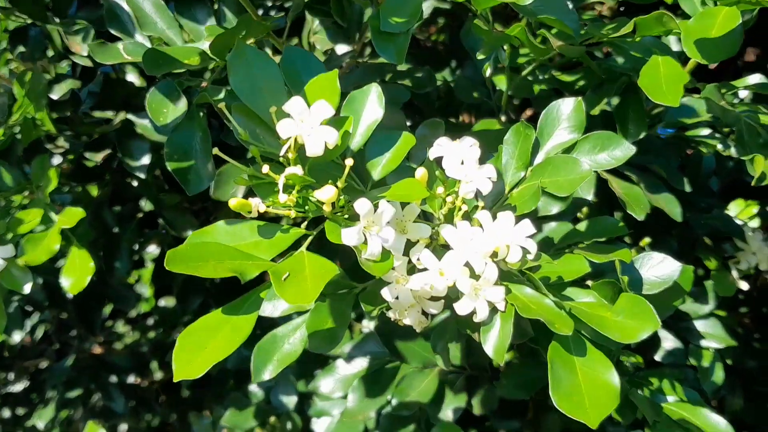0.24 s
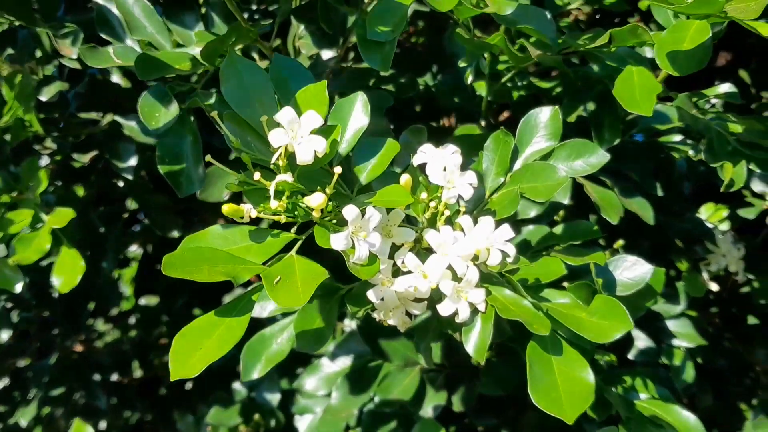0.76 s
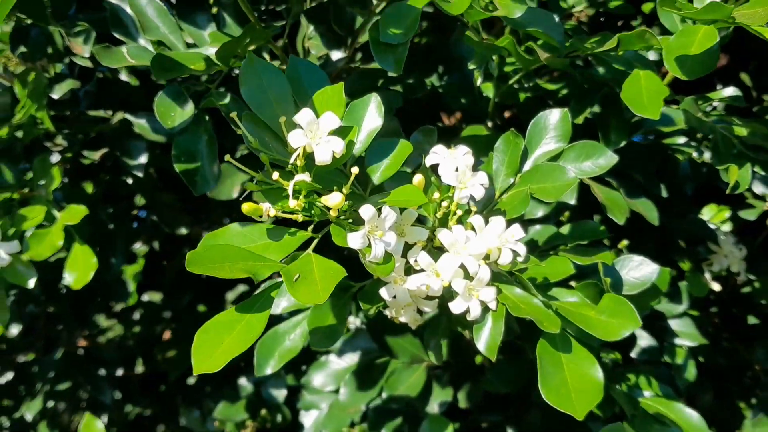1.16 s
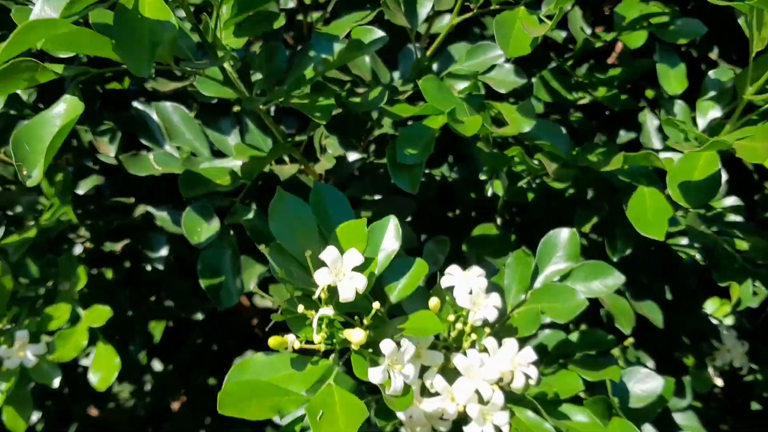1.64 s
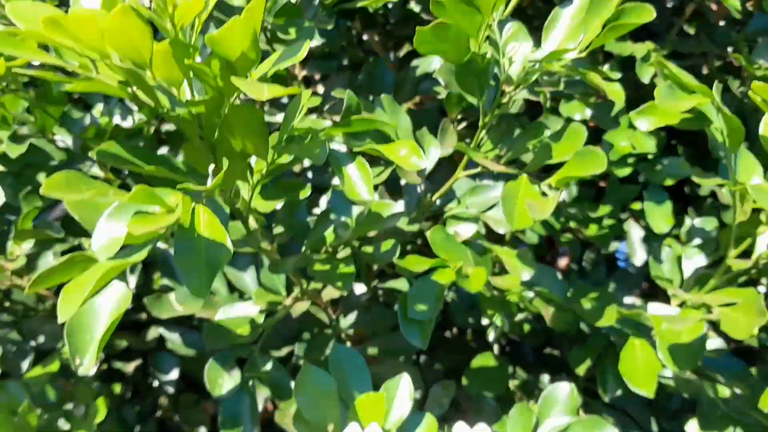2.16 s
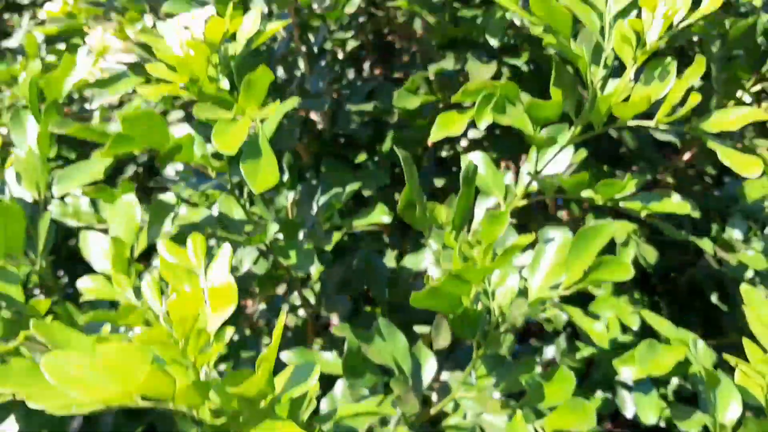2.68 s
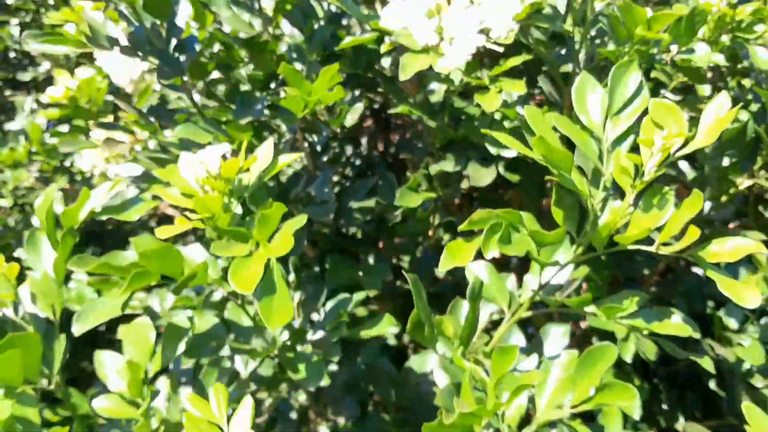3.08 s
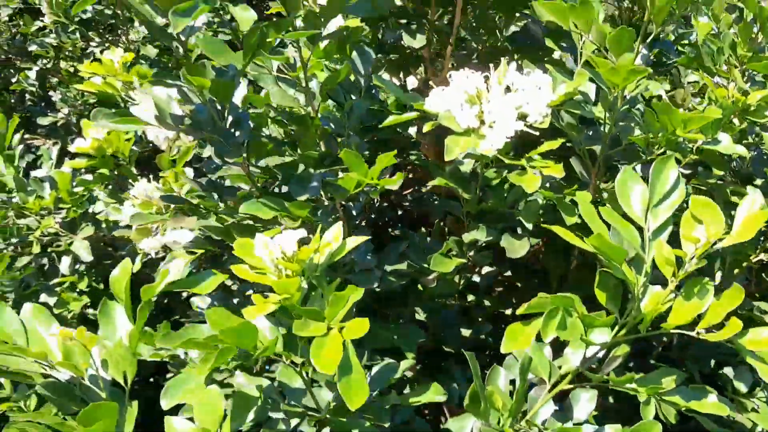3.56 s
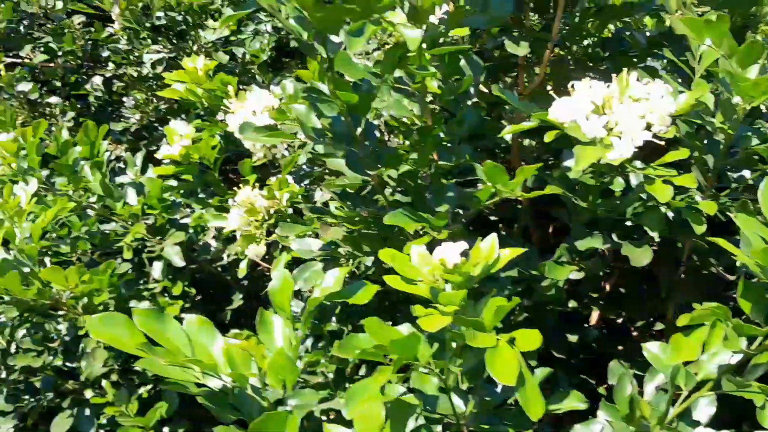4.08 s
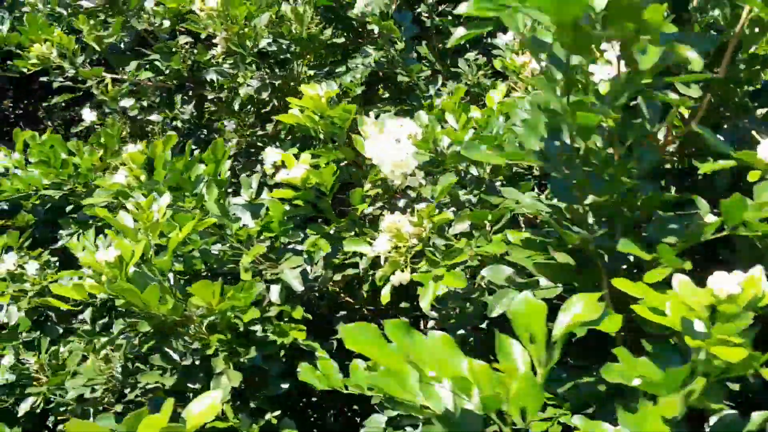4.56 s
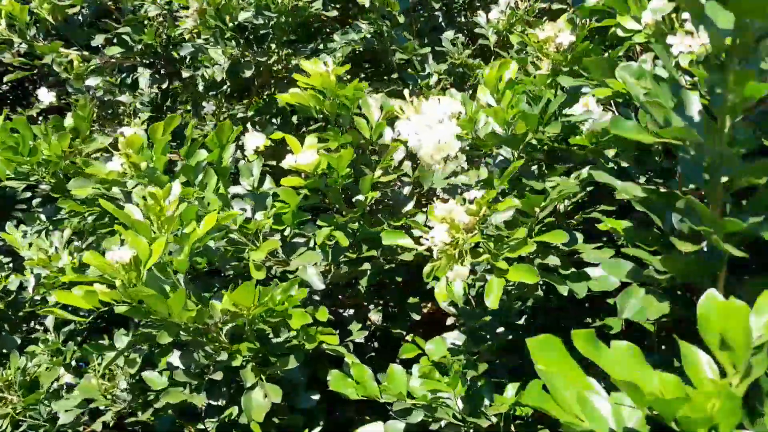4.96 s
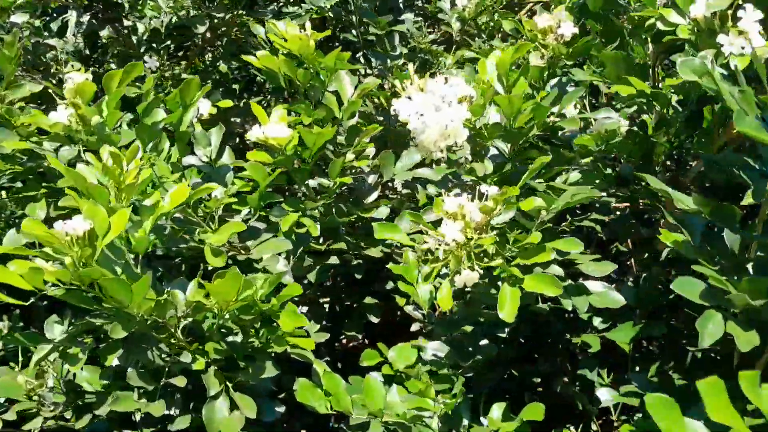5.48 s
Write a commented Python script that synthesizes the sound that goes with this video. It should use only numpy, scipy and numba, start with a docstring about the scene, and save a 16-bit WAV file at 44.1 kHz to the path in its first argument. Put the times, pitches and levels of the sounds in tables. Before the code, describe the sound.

Heavy lorries pass close by with deep throbbing engines, one changing gear with a boom and gasp, over roaring, hissing tyres.

```python
"""Heavy lorries on a highway, from a garden close by, on a phone with two microphones; its limiter ducks loud peaks.
One lorry (summed orders of its firing rate) pulls in low gear as a slowing one brakes on its engine; brakes squeak.
At 1.6 s the first changes gear with an exhaust boom and a gasp, coasts, then pulls again from 2.7 s, throbbing
against a cruising lorry that draws near and is closest at 4.9 s. A leaf, in bright scrapes, brushes the phone at 5.5 s.
Tyres roar and hiss throughout as filtered noise over a rumbling bed; sine whines and narrow noisy rings come and go."""
import sys
import numpy as np
from scipy import signal
from scipy.fft import rfft, irfft, dct
from scipy.io import wavfile
from scipy.ndimage import uniform_filter1d, minimum_filter1d
from numba import njit

SR = 44100
rng = np.random.default_rng(int(sys.argv[2]) if len(sys.argv) > 2 else 0)


def transcribe(signal):
    """Save signal, clipped to [-1, 1], as a 16-bit WAV file at the path in sys.argv[1]."""
    frames = np.atleast_2d(signal).T
    limited = np.clip(frames, -1, 1)
    pcm = np.round(limited * 32767).astype(np.int16)
    wavfile.write(sys.argv[1], SR, pcm)


N = 252693
T = np.arange(N) / SR
HZ = np.maximum(np.arange(N // 2 + 1) * SR / N, 1)


def undb(db):
    """Decibels to gain."""
    return 10 ** (np.asarray(db) / 20)


def curves(table):
    """Each column of a table, joined by straight lines in time."""
    s, *columns = np.transpose(table)
    return [np.interp(T, s, column) for column in columns]


def over_hz(points):
    """Points joined on a log-frequency axis."""
    hz, value = np.transpose(points)
    return np.interp(np.log(HZ), np.log(hz), value)


def unit(x):
    """Scale to rms 1."""
    return x / np.sqrt(np.mean(x ** 2))


def ramp(at_s, length_s):
    """A smooth step from 0 to 1, centred on at_s."""
    return .5 + .5 * np.sin(np.pi * np.clip((T - at_s) / length_s, -.5, .5))


def swell(at_s, half_s):
    """A bell that reaches 1 at at_s and 1/e at half_s to either side."""
    return np.exp(-((T - at_s) / half_s) ** 2)


def walk(rate):
    """Smooth chance with spread 1 that changes about rate times a second."""
    return unit(irfft(rfft(rng.standard_normal(N)) / (1 + (HZ / rate) ** 4), N))


def band(lo_hz, hi_hz):
    """Gain of a steep band-pass."""
    return ((1 + (lo_hz / HZ) ** 16) * (1 + (HZ / hi_hz) ** 16)) ** -.5


# how alike a wide road sounds at the two microphones: (frequency [Hz], coherence [0-1])
MIC_COHERENCE = [(100, .997), (250, .96), (500, .87), (900, .66), (1600, .6), (2500, .7), (4200, .5),
                 (7000, .45), (9000, .25), (15000, .2)]


def spread_noise(gain):
    """Coloured noise from a wide road: alike in both microphones in the bass, less so in the treble."""
    alike = np.clip(over_hz(MIC_COHERENCE), 0, 1)
    mid, side = rfft(rng.standard_normal((2, N))) * gain * np.sqrt([1 + alike, 1 - alike])
    return unit(irfft(np.array([mid + side, mid - side]), N))


def turning(hz):
    """Phase in radians of something that repeats at hz."""
    return 2 * np.pi * np.cumsum(hz) / SR


def exhaust(phase, levels_db, order, jitter, flutter_db):
    """Orders of the firing rate; uneven firings shake their timing [rad] and moving air their level."""
    shaken = phase + jitter * walk(24)
    out = 0
    for k, db in zip(order, levels_db):
        out = out - undb(db + flutter_db * walk(6.8)) * np.cos(k * shaken)
    return out


# the firing rate climbs evenly from LOW_GEAR_HZ, then drops as the throttle shuts
LOW_GEAR_HZ, CLIMB_HZ_PER_S, SHIFT_S, REV_DROP_S = 126.9, 4.25, 1.615, .055
# it coasts, then takes up the load again; the upper orders come back later
COAST_DB, LOAD_S, LOAD_RISE_S, UPPER_LAG_S = -9.5, 2.654, 0.34, 0.53
# firing rate in high gear: (time [s], rate [Hz])
HIGH_GEAR_RATE = [(1.7, 102.62), (2.5, 105.85), (2.85, 110.45), (3.55, 115.54), (4.25, 116.33),
                  (5.1, 112.01), (5.73, 113.58)]
# exhaust of the lorry: (order, level in low gear [dB], level in high gear [dB])
GEAR_ORDERS = [(1, -26.5, -12.5), (2, -26.5, -23.5), (4, -29.5, -36), (6, -37, -58)]
# single orders swell as it moves along the road, and the fourth swells on the overrun after the gear change:
# (order, time [s], half length [s], gain [dB])
ORDER_SWELLS = [(2, 0.63, 0.39, 11.5), (2, 1.4, 0.27, 9), (4, 0.93, 0.44, 6), (6, 1.38, 0.49, 10.5),
                (4, 1.95, 0.33, 15), (4, 3.547, 0.3, 13), (2, 4.5, 0.41, 7)]


def shifting_lorry():
    """Revs up in low gear, drops its revs at the change, coasts and pulls again in high gear."""
    high_hz, = curves(HIGH_GEAR_RATE)
    low_gear = np.exp(-np.maximum(T - SHIFT_S, 0) / REV_DROP_S)
    low_hz = LOW_GEAR_HZ + CLIMB_HZ_PER_S * T
    phase = turning(high_hz + low_gear * (low_hz - high_hz))
    levels = []
    for order, low_db, high_db in GEAR_ORDERS:
        coasting = 1 - ramp(LOAD_S + UPPER_LAG_S * (round(order) > 1), LOAD_RISE_S)
        swell_db = sum(db * swell(s, half) for k, s, half, db in ORDER_SWELLS if round(k) == round(order))
        gear_db = low_gear * low_db + (1 - low_gear) * (high_db + COAST_DB * coasting)
        levels.append(gear_db + swell_db)
    main = exhaust(phase, levels, order=(1, 2, 4, 6), jitter=0.084, flutter_db=1.54)
    # unequal cylinders add weak odd orders; a rough growl of high orders follows the sixth
    fourth, sixth = levels[2:]
    odd = exhaust(phase, [fourth - 14, fourth - 15], order=(3, 5), jitter=0.055, flutter_db=5.0)
    growl_db = [sixth - 4, sixth - 2, sixth - 4.5]
    growl = exhaust(phase, growl_db, order=(7, 10, 12), jitter=0.24, flutter_db=5.0)
    return main + odd + growl


# exhaust boom as the throttle shuts, with a gasp of gas
BOOM_HZ, BOOM_SAG_HZ_PER_S, BOOM_DB = 76, 63, -3
BOOM_S, BOOM_ATTACK_S, BOOM_RELEASE_S = 0.143, .014, 0.031
# the gasp gains 3 dB with the engines in scene()
GASP_DB, GASP_FADE_S, GASP_LOW_HZ, GASP_HIGH_HZ = -15, 0.11, 330, 1150


def boom():
    """The exhaust pipe resounds for a few cycles at the gear change while a gasp of gas escapes."""
    since = np.maximum(T - SHIFT_S, 0)
    opened = ramp(SHIFT_S + BOOM_ATTACK_S / 2, BOOM_ATTACK_S)
    held = 1 - ramp(SHIFT_S + BOOM_S, BOOM_RELEASE_S)
    phase = turning(BOOM_HZ - BOOM_SAG_HZ_PER_S * np.minimum(since, BOOM_S))
    pipe = exhaust(phase, [BOOM_DB, BOOM_DB - 16], order=(1, 2), jitter=.3, flutter_db=.8)
    gasp = spread_noise(band(GASP_LOW_HZ, GASP_HIGH_HZ)) * undb(GASP_DB) * np.exp(-since / GASP_FADE_S)
    return opened * (held * pipe + gasp)


# when the cruising lorry draws near and how long that takes; its bass swells as it goes by
NEAR_S, NEARING_S = 2.47, 1.3
CLOSEST_S, CLOSEST_HALF_S, CLOSEST_DB = 4.94, 0.59, 5
# cruising lorry: (time [s], firing rate [Hz])
CRUISE_RATE = [(0, 56.8), (1.4, 54.2), (2.8, 57.3), (4.1, 60.15), (5.73, 61.0)]
# its exhaust: (order, level while far [dB], level once near [dB])
CRUISE_ORDERS = [(1, -28, -14.5), (2, -17, -15), (3, -46, -36.5)]


def cruising_lorry():
    """Nearly holds its speed and draws near; its second order beats against the first of the shifting lorry."""
    hz, = curves(CRUISE_RATE)
    near = ramp(NEAR_S, NEARING_S)
    first, second, third = (far_db + near * (near_db - far_db) for _, far_db, near_db in CRUISE_ORDERS)
    first = first + CLOSEST_DB * swell(CLOSEST_S, CLOSEST_HALF_S)
    return exhaust(turning(hz), [first, second, third], order=(1, 2, 3), jitter=0.04, flutter_db=1.0)


# the firing rate sags evenly; a burst of engine braking dies down to a drone that recedes
SLOWING_HZ, SAG_HZ_PER_S = 81.8, 2.85
BRAKING_DB, BRAKING_S, DRONE_DB = -10, 0.31, -17
RECEDES_S, RECEDE_DB_PER_S = 2.55, 8


def slowing_lorry():
    """A rough, sinking drone, loud under engine braking, that fades down the road."""
    burst = undb(BRAKING_DB) * (1 - undb(DRONE_DB - BRAKING_DB))
    gain = undb(DRONE_DB) + burst * swell(0, BRAKING_S)
    away_db = -RECEDE_DB_PER_S * np.maximum(T - RECEDES_S, 0)
    phase = turning(SLOWING_HZ - SAG_HZ_PER_S * T)
    return gain * exhaust(phase, [away_db], order=(1,), jitter=0.21, flutter_db=0.9)


TONE_FADE_S = 0.21
# steady tones: transmission whines, and at 3.6 s the third order of the shifting lorry:
# (start [s], end [s], start pitch [Hz], end pitch [Hz], waver [Hz], level [dB])
STEADY_TONES = [(-.1, 1.6, 351.4, 347, 1.2, -34.5), (2.1, 4.52, 367.7, 385, 6.53, -27.5),
                (3.6, 4.2, 347.5, 347, 1.3, -33.5), (5.42, 5.9, 387, 383, 7, -30)]


def steady_tones():
    """Sines of gears and of one engine order that come and go, wavering at 5.5 Hz and by chance."""
    waver = np.sin(turning(np.full(N, 5.5))) + walk(28.2)
    flutter_db = 1.5 * walk(9)
    out = 0
    for start, end, start_hz, end_hz, waver_hz, db in STEADY_TONES:
        held = ramp(start, TONE_FADE_S) * (1 - ramp(end, TONE_FADE_S))
        hz = np.interp(T, [start, end], [start_hz, end_hz]) + waver_hz * waver
        out = out + held * undb(db + flutter_db) * np.sin(turning(hz))
    return out


FAR_LOSS_DB_PER_KHZ = 0.87  # more treble lost each time the distance grows by the closest distance
# vehicles passing the garden: (closest at [s], time to go its own distance from the garden [s],
# level [dB], treble lost in the leaves [dB per kHz])
VEHICLE_PASSES = [(.2, 0.28, -26, 0.17), (.5, 0.26, -20.5, 2.5), (1.22, 0.27, -18.5, 1.75),
                  (2.2, 0.48, -20, 2.53), (3.3, .15, -25.5, .5), (3.95, .45, -22, 0.22),
                  (4.9, 0.28, -36, -0.2)]


def traffic(lo_hz, hi_hz, band_db, far_db):
    """Gain of one tyre band: each vehicle falls off as 1 / distance and dulls as it recedes, over far traffic."""
    khz = np.sqrt(lo_hz * hi_hz) / 1000
    power = undb(far_db) ** 2
    for closest_s, passing_s, db, dullness in VEHICLE_PASSES:
        distance = np.hypot(1, (T - closest_s) / passing_s)
        loss_db = khz * (dullness + FAR_LOSS_DB_PER_KHZ * (distance - 1))
        power = power + (undb(db + band_db - loss_db) / distance) ** 2
    return np.sqrt(power)


# tyre colour: (frequency [Hz], relative density [dB per Hz])
TREAD_COLOUR = [(560, 4), (680, 5.5), (850, 7), (1300, 5.5), (1900, 1.5), (2400, -1), (3400, -12),
                (4700, -9), (6200, -18), (8000, -22), (9500, -28.5), (12500, -32), (15500, -31)]
# tyre bands: (low edge [Hz], high edge [Hz], level relative to a pass [dB], steady far traffic [dB])
TREAD_BANDS = [(519, 1260, -1, -31), (1310, 3450, -2, -33), (2685, 8850, -3, -35),
               (7700, 13300, -10.5, -49.5)]
# extra path of the tyre noise that bounces off the ground: (time [s], delay [s])
GROUND_BOUNCE = [(0, 0.00063), (1.6, .0013), (3, 0.000813), (4, 0.001153), (5.73, 0.0016)]


def tyres():
    """Tread noise from low roar to fine spray; gusts stir it and its ground echo sweeps a faint comb through it."""
    colour = undb(over_hz(TREAD_COLOUR))
    gust_db = 1.05 * walk(5)
    out = 0
    for lo, hi, band_db, far_db in TREAD_BANDS:
        flutter_db = .6 * walk(16) + gust_db * np.sqrt(lo / 4000)
        noise = spread_noise(colour * band(lo, hi))
        out = out + noise * traffic(lo, hi, band_db, far_db) * undb(flutter_db)
    delay, = curves(GROUND_BOUNCE)
    echo = np.array([np.interp(T - delay, T, channel) for channel in out])
    return out + .22 * echo


def resonances(table, scatter=1.0):
    """Narrow noisy bands that swell, glide and fade; scattered sound reaches each microphone on its own."""
    out = np.zeros((2, N))
    for start, end, start_hz, end_hz, width_hz, db in table:
        on = (T > start) & (T < end)
        progress = (T[on] - start) / (end - start)
        chance = rng.standard_normal((6, N))[:, on]
        lowpass = signal.butter(2, width_hz / 2, fs=SR, output="sos")
        drift = signal.sosfilt(lowpass, chance)
        carrier = np.exp(1j * turning(start_hz + (end_hz - start_hz) * progress))
        # ring 0 is shared by both microphones, rings 1 and 2 belong to one each
        ring = np.real((drift[:3] + 1j * drift[3:]) * carrier)
        out[:, on] += undb(db) * np.sin(np.pi * progress) * unit(ring[0] + scatter * ring[1:])
    return out


# narrow noisy bands: tread and panel rings, and two rough high engine orders (from 1613 and from 1154 Hz):
# (start [s], end [s], start pitch [Hz], end pitch [Hz], width [Hz], level at the height of the swell [dB])
NOISY_BANDS = [(0, 0.64, 2148, 1650, 201, -26), (.1, .65, 1484, 1254, 183, -29),
               (.4, 2.4, 849, 819, 190, -24.5), (.9, 1.2, 1613, 1570, 90, -27.5),
               (1.3, 1.96, 1217, 1104, 260, -26.5), (.8, 1.25, 5100, 5200, 600, -38.5),
               (2.0, 4, 2760, 2430, 463, -36), (3.05, 3.7, 1154, 1332, 88.7, -32.5),
               (3.3, 6, 3550, 3470, 703, -32.5), (4.1, 5.5, 1863, 1722, 150, -31.5),
               (4.5, 5.9, 1090, 1020, 147, -35.5), (4.85, 5.4, 5070, 5370, 396, -41)]


def noisy_bands():
    """Treads and panels ring, and two high engine orders sound roughly, as noise that drifts in pitch."""
    return resonances(NOISY_BANDS)


# short squeaks of brakes: (start [s], end [s], start pitch [Hz], end pitch [Hz], width [Hz], peak level [dB])
BRAKE_SQUEAKS = [(1.125, 1.21, 4630, 4630, 40, -30.5), (1.135, 1.18, 6150, 6100, 160, -38),
                 (1.135, 1.18, 7500, 7300, 120, -37.5), (2.94, 3.0, 8340, 8270, 160, -41)]


def squeaks():
    """Brakes ring briefly in narrow high bands, strongly scattered between the microphones."""
    return resonances(BRAKE_SQUEAKS, scatter=3)


# a leaf at the phone: (time [s], level [dB], fade [s])
LEAF_BRUSHES = [(5.542, -32.5, 0.011), (5.574, -50, 0.011), (5.62, -45, 0.015), (5.671, -28, 0.0012),
                (5.68, -31, 0.0027)]


def leaf():
    """Each brush is a tiny bright scrape that dies quickly."""
    touch = sum(undb(db) * (T >= s) * np.exp(-abs(T - s) / fade) for s, db, fade in LEAF_BRUSHES)
    return touch * spread_noise(band(5200, 18000))


# rumble of bodies and far traffic: (time [s], level [dB])
RUMBLE_LEVEL = [(0, -18), (.7, -15.5), (1.4, -15.5), (2.2, -13.5), (3.2, -17), (4.2, -21), (5, -17),
                (5.73, -17.5)]
# its colour: (frequency [Hz], relative density [dB per Hz])
RUMBLE_SPECTRUM = [(20, -33), (36, -32), (52, 3.5), (72, -3.5), (95, -3), (125, 0), (160, -10.5),
                   (210, -12), (290, -17), (400, -23), (700, -59.5)]


def rumble():
    """Trailer bodies and far engines merge into a low bed; tyre casings drone along with the roar."""
    db, = curves(RUMBLE_LEVEL)
    bed = spread_noise(undb(over_hz(RUMBLE_SPECTRUM))) * undb(db + 1.0 * walk(4.8))
    casings = spread_noise(band(312, 635)) * traffic(*TREAD_BANDS[0]) * undb(-5.5)
    return bed + casings


def from_left(pair, count):
    """The right channel comes count samples later."""
    return np.array([pair[0], np.pad(pair[1], (count, 0), "edge")[:N]])


# balance of the two microphones: (frequency [Hz], left minus right [dB])
MIC_BALANCE = [(60, 1.6), (120, .9), (250, 1.1), (500, 2.6), (800, 2.5), (1400, 0), (2500, 5), (3500, 4),
               (4500, 1.5), (6300, 4), (9500, 0), (14000, 5)]


def phone_shadow(pair):
    """The right microphone lies in the shadow of the phone, so the balance varies with frequency."""
    shade_db = np.repeat(over_hz(MIC_BALANCE), 2)[:N] / 2  # a DCT has twice as many bins
    shaded = dct(pair, norm="ortho") * undb([shade_db, -shade_db])
    return dct(shaded, type=3, norm="ortho")


# the right microphone hears the engines and the tyres later [samples]
ENGINE_LAG, TYRE_LAG = 16, 23


def scene():
    """All of the road, on the left of the phone."""
    onset = np.minimum(T / .01, 1)
    engines = shifting_lorry() + cruising_lorry() + slowing_lorry() + boom() + steady_tones()
    # sqrt(2) makes the level of each engine tone its rms
    low = from_left(onset * (np.sqrt(2) * engines + rumble()), count=ENGINE_LAG)
    high = from_left(tyres() + noisy_bands() + squeaks() + leaf(), count=TYRE_LAG)
    return phone_shadow(low + high)


@njit
def peak_hold(x, fall):
    """Follows every peak at once and lets go slowly."""
    out, held = np.empty(len(x)), 0.
    for i in range(len(x)):
        held = max(x[i], held * fall)
        out[i] = held
    return out


TOP_HZ = 15500  # the treble stops here


def record(dry):
    """A quick limiter turns everything down under loud peaks; what exceeds full scale is cut flat; the top is cut."""
    ceiling, release_s = 1.08, .06
    peak = peak_hold(np.abs(dry).max(axis=0), np.exp(-1 / (release_s * SR)))
    gain = ceiling / np.maximum(peak, ceiling)
    gain = uniform_filter1d(minimum_filter1d(gain, size=221), size=221)  # eases in over 5 ms
    flattened = np.clip(dry * gain, -1, 1)
    return signal.sosfilt(signal.ellip(10, .1, 90, TOP_HZ, fs=SR, output="sos"), flattened)


dry = scene()
out = record(dry)
transcribe(out)
```